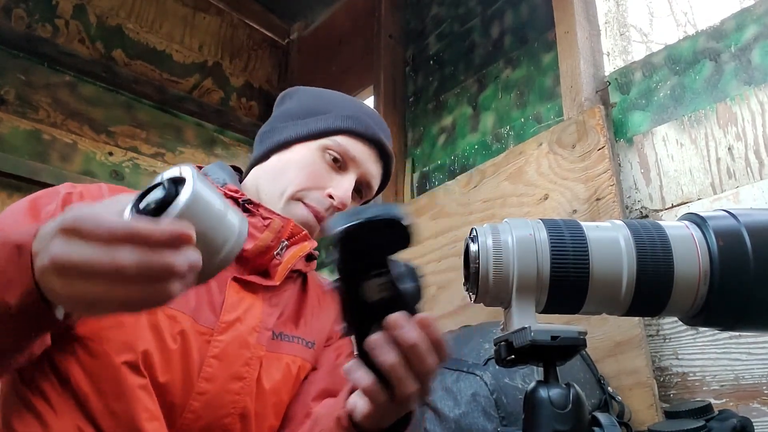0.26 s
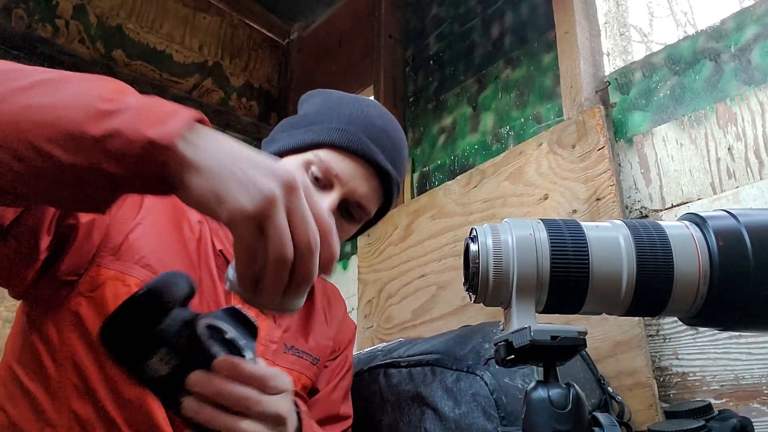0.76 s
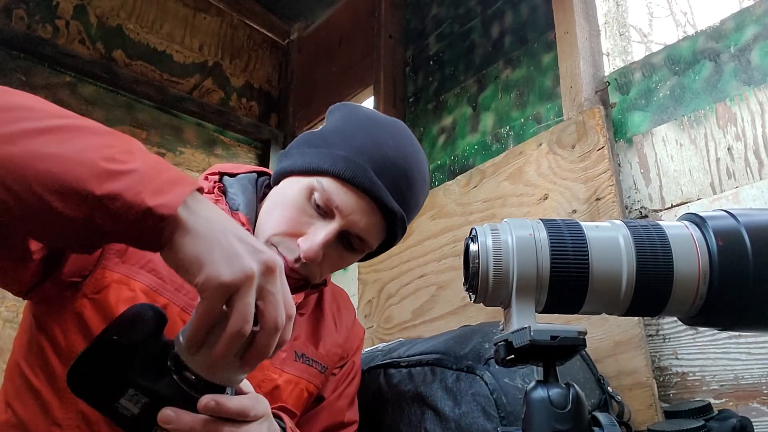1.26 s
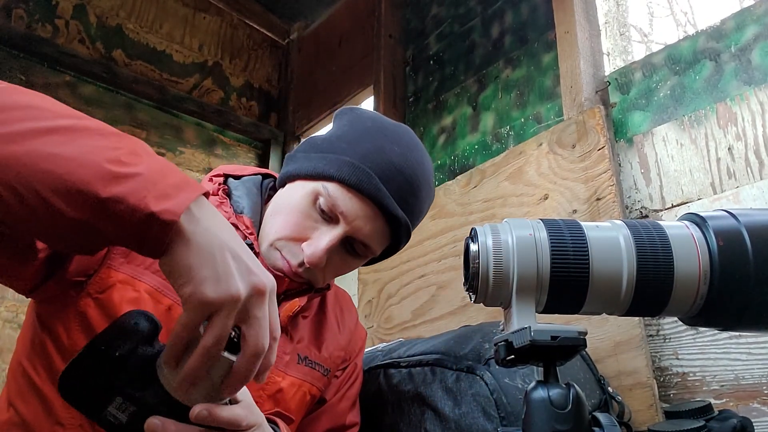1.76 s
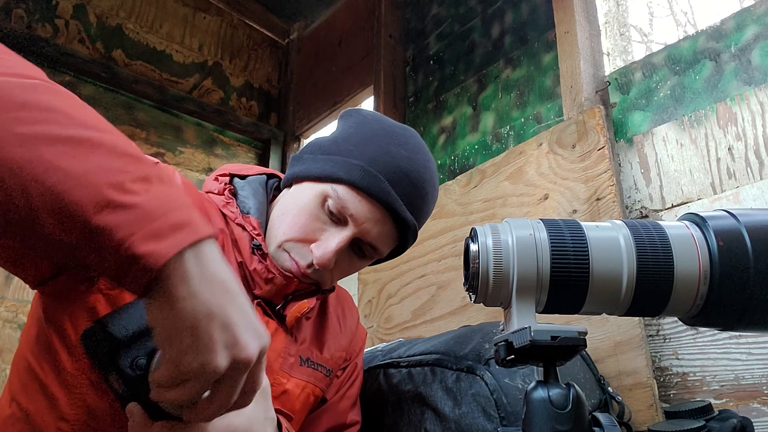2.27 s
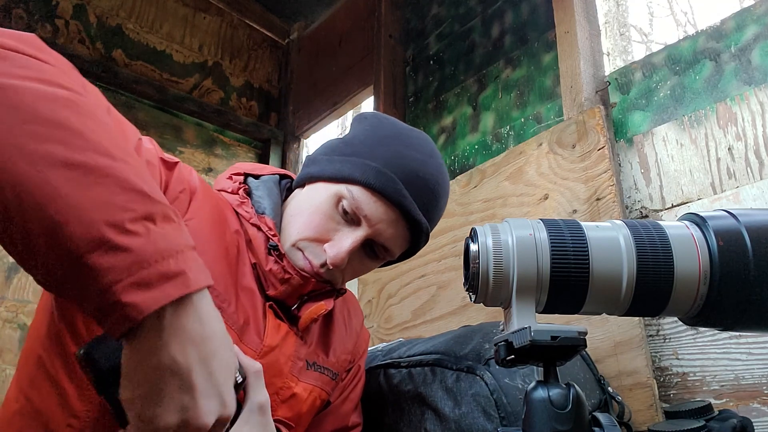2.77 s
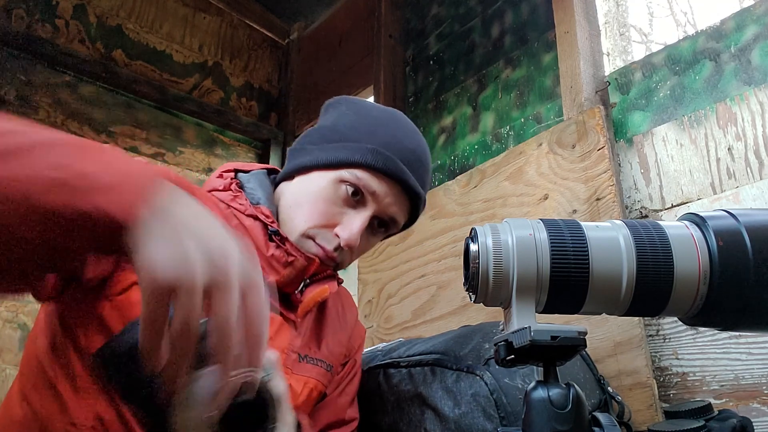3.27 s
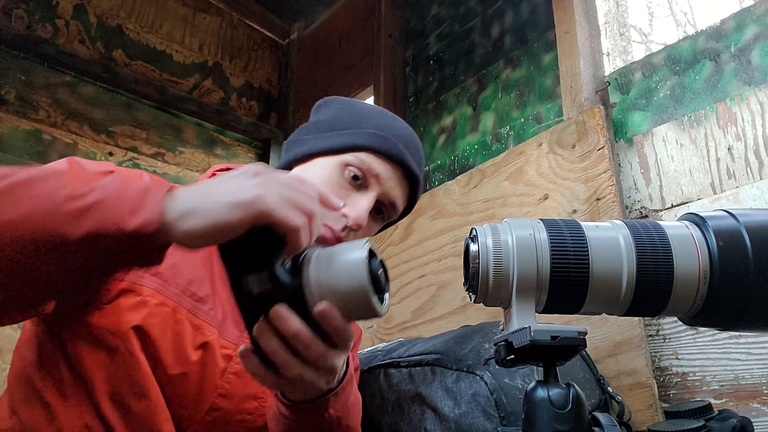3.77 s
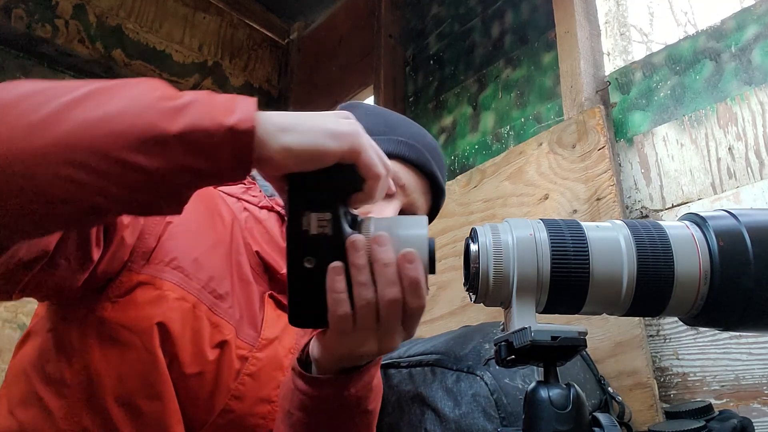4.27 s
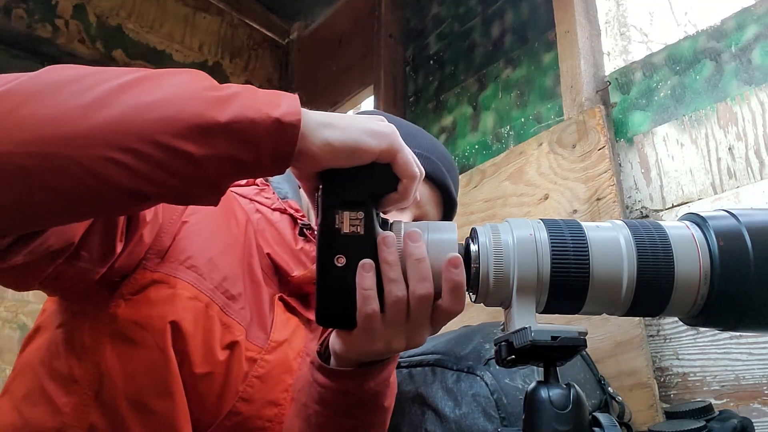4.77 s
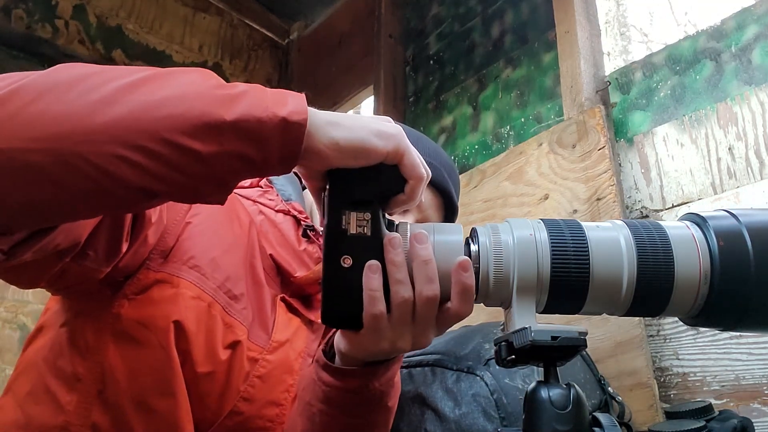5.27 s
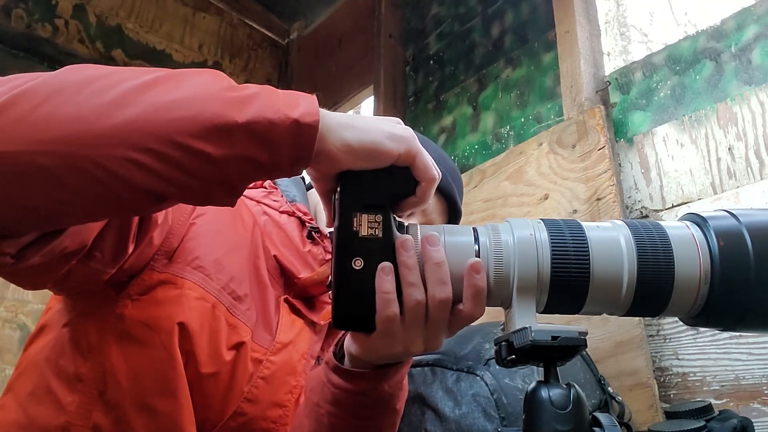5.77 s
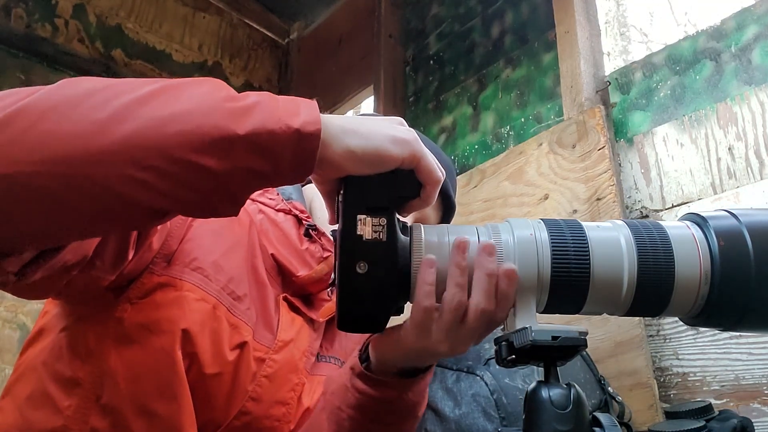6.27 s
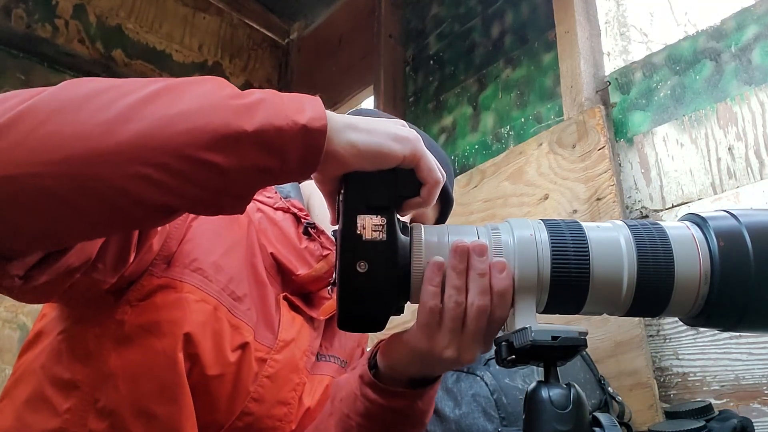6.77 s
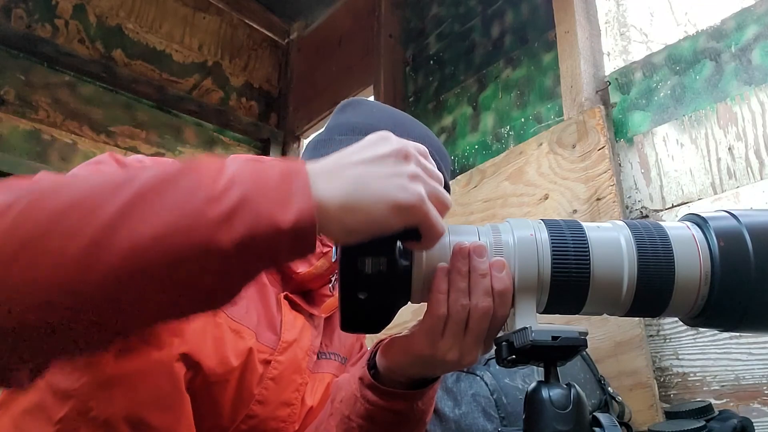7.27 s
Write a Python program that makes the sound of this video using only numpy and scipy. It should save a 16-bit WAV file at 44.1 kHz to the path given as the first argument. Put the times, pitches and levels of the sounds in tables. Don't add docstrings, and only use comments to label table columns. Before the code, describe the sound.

Close stereo pickup of hands fitting camera parts in a dry little wooden shelter. Crisp synthetic sleeve rubs lead into light metallic scraping, bright rattling clacks, a brief alignment knock and a sharp double click. Cloth moves again, then things go almost still. Softer, fuller bumps and a short grinding twist end in a snap, followed by faint scuffs, a grip bump and tiny pin click. Low distant machine rumble and slight hiss continue throughout.

```python
import sys
import numpy as np
from scipy import signal
from scipy.fft import rfft, irfft, next_fast_len
from scipy.io import wavfile
from scipy.ndimage import uniform_filter1d

SR = 44100
rng = np.random.default_rng(int(sys.argv[2]) if len(sys.argv) > 2 else 0)


def amplitude_ratio(level_db):
    exponent = np.asarray(level_db, float) / 20
    return 10 ** exponent


def master(y):
    cut = np.clip(np.atleast_2d(y).T, -1, 1)
    pcm = np.round(cut * 32767)
    wavfile.write(sys.argv[1], SR, pcm.astype(np.int16))


N = 332073
GRAIN = 32

# (time [s], strength [dB], thud over ring [dB], edge crack over strength [dB])
SEAT_HITS = [(1.3485, -36, -1.5, -12), (1.3505, -37, -7, -19), (1.3604, -42, -8.5, -3.5),
             (1.397, -34, -6, -15), (1.4160, -26.5, -9, -26), (1.4204, -35, -22, -11),
             (1.4396, -22.5, -9.5, -22), (1.4463, -28.5, 35, -34), (1.4784, -39.5, 3, -14),
             (1.494, -31.5, -0.5, -23), (1.5015, -45, 13, -26), (1.5136, -37, -1, -20),
             (1.5225, -33, 2, -38), (1.531, -48, -4, -39), (1.5655, -46, -3, -33),
             (1.573, -47.5, -10.5, -25), (1.6419, -37.5, 7.5, -24), (1.7093, -50.5, 5, -33)]
DROP_HITS = [
    (1.7752, -19.5, -12.5, -15.5),
    (1.7785, -27, -5, -14),
    (1.7818, -16.5, -28.5, -13.5),
    (1.7854, -27.5, -3, -10),
    (1.7912, -21.5, -17, -17),
    (1.7998, -18, -6.5, -21),
    (1.8034, -21.5, -18, -21),
    (1.8075, -32.5, -22, -24),
]
ALIGN_HITS = [
    (1.9135, -54.5, 4, -25),
    (1.935, -49.5, -2, -1.5),
    (1.9584, -25.5, -17, -15),
    (1.9636, -30.5, -6, -30),
]
TURN_HITS = [
    (2.1695, -51.5, 12, -25),
    (2.1849, -46.5, -3.5, -27),
    (2.2020, -28, -2, -19.5),
    (2.2035, -30, -3, -26),
    (2.2104, -35, -5.5, -30),
    (2.2175, -41.5, -3.5, -30),
    (2.3309, -58, -15, -15),
    (2.4154, -49, 25, -29),
    (2.4215, -52, 20, -29),
]
FINGER_HITS = [
    (1.187, -70, -25, -28),
    (1.2, -66.5, 4, -30),
    (2.444, -65, -20, -30),
    (2.951, -48, 20, -30),
    (2.963, -52.5, 20, -30),
    (3.369, -45.5, 25, -30),
    (3.391, -47.5, 20, -30),
]
LATCH_HITS = [(2.4904, -65, -2, 5), (2.5858, -62, -15, 5.5), (2.8851, -49.5, -22.5, 0.5),
              (2.8866, -45, -26.5, 6), (2.888, -49, -18.5, 5.5), (2.8932, -52, -15, 12.5),
              (2.8948, -50, -20, 9.5), (2.8972, -23, -31.5, -10.5), (2.8980, -17, -29, -11.5),
              (2.8996, -30, -29.5, -13), (2.9025, -25.5, -23.5, -18), (2.9855, -63, 0, -11),
              (3.0942, -63, -6, -6)]
TOUCH_HITS = [
    (4.7814, -77.5, 3, -2.5),
    (5.5495, -57, 0.5, -20),
    (5.5792, -32, 8, -25),
    (5.5838, -36.5, -2, -16),
    (5.5952, -36, -7.5, -16.5),
    (5.6004, -40, -3, -23),
    (5.6114, -43.5, -4, -16),
]
TWIST_HITS = [
    (5.882, -52, 8, -19.5),
    (5.8855, -45.5, 1, -17.5),
    (5.899, -40, 5, -15),
    (5.9115, -47, -5, -4),
    (5.9204, -38, 2, -19),
    (5.931, -42, 4, -23.5),
]
LOCK_HITS = [
    (5.9703, -29.5, 1, -14),
    (5.9764, -28.5, -5.5, -4.5),
    (5.9804, -36.5, 6, 4),
    (5.9864, -48, -4, -14),
    (6.0744, -59, -27, -30),
    (6.1973, -49.5, 10, -21),
    (6.2015, -51, 3.5, -38),
]
SETTLE_HITS = [
    (6.5804, -65, -3, -23),
    (6.8394, -58.5, 0.5, -29),
    (6.9268, -39, 10.5, -31),
    (6.9325, -40, -3, -28),
    (6.9414, -37.5, 11.5, -27),
    (6.9484, -49, -14, -27),
    (6.9545, -53, -7, -29),
]
PIN_HITS = [
    (3.597, -72.5, -15, 11.5),
    (4.594, -87, -9.5, 13),
    (6.9626, -36, -23, -22),
]

# (frequency [Hz], level [dB], t60 [s])
SEAT_MODES = [(269, -7, 0.06), (431, 2.5, 0.022), (500.5, 4, 0.018), (580, 3, 0.014), (656.5, 5, 0.034),
              (750, -24, 0.0048), (1430, 3, 0.011), (2410, -6, 0.018), (2952, 6, 0.021),
              (3340, 7.5, 0.00336), (3860, 8.5, 0.011), (4240, 6.5, 0.011)]
DROP_MODES = [(265, -1, 0.04), (430, 1, 0.03), (560, -8, 0.023), (672, -3, 0.028), (820, -2, 0.022),
              (950, -4, 0.013), (1400, -16, 0.01), (2480, -6, 0.01), (2760, -6, .012), (2990, 0, .02),
              (3095, -5, .015), (3760, -4, .012), (4030, -7, .01)]
ALIGN_MODES = [(290, -6, .04), (450, -10, .02), (610, -3, 0.03), (960, -10, 0.015), (1156, -3, 0.01),
               (1442, 1.5, 0.008), (2400, 0.5, 0.007), (2980, 2, 0.0078), (3892, -3, 0.01)]
TURN_MODES = [(285, 3, .05), (520, -5, .025), (670, -3, .025), (980, -7, .02), (1490, -1, .015),
              (1868, -6, .012), (2380, -2, .01), (2590, -2, .012), (3530, 3, .012), (4050, 4, .012)]
FINGER_MODES = [(331.5, -2, .04), (557, -2, 0.014), (2327, 3, 0.023), (2610, 5, 0.018)]
LATCH_MODES = [(520, -8, .03), (880, -10, 0.01), (1085, -4, 0.01), (1320, 4, 0.011), (1650, -3, 0.006),
               (1900, 2, 0.007), (2380, 4, 0.008), (2880, 1, .007), (3330, 3, 0.007), (4000, 7, .008),
               (4450, 5, .008), (6300, 8, 0.005)]
TOUCH_MODES = [(124.4, -1.5, 0.17), (188.6, -2, 0.13), (297, -1, 0.05), (511, -5.5, 0.046), (707, 1, 0.033),
               (1023, -8, 0.03), (1190, 1, 0.011), (1830, -2.5, 0.019), (2110, -8, 0.06),
               (4030, -13, 0.016), (5200, 4.5, .006)]
LENS_MODES = [(118.2, -9.5, 0.095), (186, -9.5, 0.11), (320, -1, 0.04), (500, -3, 0.03), (730, 2, 0.033),
              (870, -5, 0.027), (1050, 2, 0.014), (1340, -6, 0.008), (1980, -4.5, 0.014),
              (2650, -15.5, 0.0088), (4900, 5, 0.012)]
LOCK_MODES = [(191.6, -14.5, 0.26), (538, 2, 0.053), (652, 3.5, 0.042), (710, -7, 0.028), (827, -12, 0.018),
              (1038, -1.5, 0.03), (1160, -1.5, 0.041), (1340, -2, 0.016), (2040, 1, 0.013),
              (2120, -7.5, 0.016), (2530, -4, 0.015), (3840, -15, 0.015)]
GRIP_MODES = [(109, 0, 0.097), (283, 0.5, 0.15), (426, -1.5, 0.047), (511, 1, 0.036), (700, -8, 0.028),
              (999, 2, 0.008), (1320, -14, 0.0093), (1996, -12, 0.021), (2370, -7, 0.008)]
SCUFF_MODES = [(322, -4.5, 0.042), (570, -3.5, 0.029), (706, -10, 0.014), (1310, -8, 0.014),
               (2050, 0.5, 0.0059)]
PIN_MODES = [(402, 14, 0.081), (1972, 11.5, 0.034), (2260, 4.8, 0.02), (4850, 13, 0.02), (5770, 8.6, 0.022)]

# (time of most pressure [s], rise [s], fall [s], level [dB])
SEAT_SLIDES = [(1.351, 0.0022, 0.077, -42),
               (1.445, 0.04, 0.092, -47.5),
               (1.505, 0.038, 0.072, -47)]
TURN_SLIDES = [
    (2.225, 0.025, 0.16, -64),
    (2.3, 0.14, 0.1, -62.5),
]
LATCH_SLIDES = [(2.79, 0.064, .3, -73),
                (2.885, 0.15, 0.0091, -67)]
NUDGE_SLIDES = [
    (5.56, 0.012, 0.03, -62),
    (5.585, 0.0072, 0.086, -54.5),
    (5.61, 0.049, 0.04, -67.5),
]
LENS_SLIDES = [(5.882, 0.0029, 0.18, -50.5),
               (5.92, 0.038, 0.044, -54),
               (5.976, 0.005, 0.026, -39)]
GRIP_SLIDES = [
    (6.935, 0.006, 0.069, -61),
    (6.96, 0.05, 0.067, -62),
]
SCUFF_SLIDES = [
    (6.098, 0.051, 0.031, -63),
    (6.203, 0.0064, 0.055, -62.5),
    (6.585, 0.0059, 0.062, -68),
    (6.62, 0.08, 0.019, -66.5),
]

# (frequency [Hz], level [dB])
GEAR_PATH = [(100, -4), (170, -1), (300, -0.5), (1000, 4), (1800, -0.5), (3000, 2.5), (5000, -4),
             (6400, -1.5), (9000, -9.5), (12000, -1), (16000, -4)]
# (frequency [Hz], t60 [s])
HIDE_T60 = [(250, 0.2), (700, 0.094), (1500, 0.1), (3000, 0.073), (6000, 0.039), (12000, 0.041)]
# (time [s], fade either side [s], swish level [dB], crispness [dB], weave rasp over swish [dB])
ARM_MOVES = [(0.03, 0.38, -71.5, 5, -10), (0.285, 0.1, -69.5, 1, 2), (0.44, 0.15, -69.5, 2.5, 8.5),
             (0.565, 0.23, -64.5, -1, -7), (0.744, 0.19, -64, 1, -2.5), (1.002, 0.31, -73.5, 5.5, -13),
             (1.563, 0.27, -80.5, 10, -4), (1.87, 0.48, -74.5, 6.5, -6), (2.272, 0.13, -70.5, 3.5, -32),
             (2.417, 0.32, -76, 6, -1.5), (2.598, 0.23, -74, 5, -23), (2.876, 0.15, -69, 1.5, 1.5),
             (3.19, 0.15, -67, 3, -8), (3.427, 0.19, -63.5, 0.5, -0.5), (3.8, 0.26, -75.5, 5, -13),
             (4.086, 0.24, -65.5, -0.5, 0), (4.355, 0.17, -72.5, 2.5, -3.5), (4.8, 0.49, -81, 11, -4),
             (6.032, 0.14, -72, 4.5, -4), (6.443, 0.39, -85, 5, 0), (7.03, 0.37, -88, 8.5, -2),
             (7.27, 0.27, -74, 3.5, -9)]
# (low [Hz], high [Hz], level at full arm speed [dB], rise with arm speed [dB per dB],
# share of crispness [dB per dB])
CLOTH_RANGES = [
    (3200, 9930, 4.5, 1.0, -1.45),
    (153, 1400, 7.5, 1.45, 0.13),
    (10800, 18400, 8.5, 2.1, 1.0),
    (1790, 2850, 4.5, 1.0, -0.37),
]
# (frequency [Hz], level [dB])
NYLON = [(120, 3.5), (250, 9), (600, 1), (950, -8.5), (1350, -1), (1850, -8), (2600, -0.5), (4100, 4),
         (5200, 0), (6200, 4), (9300, -6), (11500, 3), (13200, 1.5), (15000, 4)]
# (frequency [Hz], level [dB per Hz])
AIR = [(15, -37), (27, -21), (45, -8), (62, -5), (85, -8), (115, -14.5), (150, -17), (330, -21.5),
       (450, -28), (750, -47.5), (1500, -49.5), (3000, -49.5), (8500, -60.5), (15000, -49.5)]
# (frequency [Hz], level [dB], width [Hz], waver [dB])
HUM = [(58, -56, 0.96, 2.2), (113.5, -65, 4, 2.5), (331.8, -72, 5, 0)]
# (frequency [Hz], left minus right [dB])
PORTS = [(200, 0), (450, -4), (800, -2.5), (1400, 6.5), (2300, -5), (4000, 4), (7000, -3.5), (11500, -3.5),
         (15000, 10)]


def gear():
    seat = contacts(SEAT_HITS, SEAT_MODES, crack_db=9.1, low_hz=280, top_hz=6900, tick_s=0.0014,
                    fine_db=1.9, pan_db=-1.9)
    seat += slide(SEAT_SLIDES, SEAT_MODES, ring_db=-13.5, scratch_db=0.48, top_hz=4200)
    drop = contacts(DROP_HITS, DROP_MODES, crack_db=7.5, low_hz=150, top_hz=4830, tick_s=0.00062,
                    fine_db=1.95, pan_db=-0.9)
    align = contacts(ALIGN_HITS, ALIGN_MODES, crack_db=7.2, low_hz=480, top_hz=4100, tick_s=0.00093,
                     fine_db=0.27, pan_db=0.0)
    turn = contacts(TURN_HITS, TURN_MODES, crack_db=5.5, low_hz=250, top_hz=3900, tick_s=0.0009,
                    fine_db=-1.5, pan_db=-2.0)
    turn += slide(TURN_SLIDES, TURN_MODES, ring_db=5.5, scratch_db=9.5, top_hz=1800)
    fingers = contacts(FINGER_HITS, FINGER_MODES, crack_db=-5, low_hz=250, top_hz=3000, tick_s=0.001,
                       fine_db=0.5, pan_db=-0.5)
    latch = contacts(LATCH_HITS, LATCH_MODES, crack_db=14, low_hz=575, top_hz=5900, tick_s=0.00059,
                     fine_db=1.5, pan_db=-0.19)
    latch += slide(LATCH_SLIDES, LATCH_MODES, ring_db=9.7, scratch_db=2.5, top_hz=4000)
    touch = contacts(TOUCH_HITS, TOUCH_MODES, crack_db=14.7, low_hz=109, top_hz=2400, tick_s=0.0004,
                     fine_db=-4, pan_db=1.7)
    touch += slide(NUDGE_SLIDES, TOUCH_MODES, ring_db=0, scratch_db=0, top_hz=4100)
    twist = contacts(TWIST_HITS, LENS_MODES, crack_db=4.6, low_hz=340, top_hz=1750, tick_s=0.0031,
                     fine_db=-6.0, pan_db=0.87)
    twist += slide(LENS_SLIDES, LENS_MODES, ring_db=-1.0, scratch_db=-2.0, top_hz=5000)
    twist += contacts(LOCK_HITS, LOCK_MODES, crack_db=6.3, low_hz=250, top_hz=2000, tick_s=0.00062,
                      fine_db=2.6, pan_db=-0.65)
    settle = contacts(SETTLE_HITS, GRIP_MODES, crack_db=2.1, low_hz=350, top_hz=2550, tick_s=0.00067,
                      fine_db=2.0, pan_db=-0.4)
    settle += slide(GRIP_SLIDES, GRIP_MODES, ring_db=1.6, scratch_db=0.88, top_hz=8600)
    settle += slide(SCUFF_SLIDES, SCUFF_MODES, ring_db=1.5, scratch_db=2.2, top_hz=2500)
    pin = contacts(PIN_HITS, PIN_MODES, crack_db=9.8, low_hz=300, top_hz=6300, tick_s=0.00033,
                   fine_db=-4.5, pan_db=-1.7)

    in_lap = [hide(grip, lag_s=-.00039, echo_db=-5) for grip in (seat, drop, align, turn, fingers)]
    on_knee = [hide(latch, lag_s=-.0003, echo_db=-5)]
    on_lens = [hide(grip, lag_s=.00047, echo_db=-4) for grip in (touch, twist, settle, pin)]
    return pair(colour(sum(in_lap + on_knee + on_lens), GEAR_PATH), share=0.97)


def contacts(events, modes, crack_db, low_hz, top_hz, tick_s, fine_db, pan_db):
    out = np.zeros((2, N + SR))
    t = np.arange(SR // 8) / SR
    for time_s, strength_db, weight_db, hard_db in events:
        thud, ring = ringing(modes, scatter_db=3)
        chance = rng.standard_normal((4, len(t)))
        crack = chance * (.5 * np.exp(-t / tick_s) + 0.19 * np.exp(-t / 0.0099))
        crack[:, 0] = 0.83 * np.sqrt(tick_s * SR) * np.sign(crack[:, 0])
        ring = ring + amplitude_ratio(crack_db) * band(crack[0], 420, top_hz)
        thud = thud + amplitude_ratio(crack_db + 8.0) * band(crack[1], low_hz, 730)
        edge = band(crack[2], 3505, 8560)
        fizz = band(crack[3], 9800, 18360)
        parts = [(ring, -max(weight_db, 0)),
                 (thud, min(weight_db, 0) - 0.5),
                 (edge, hard_db - fine_db + 12.0),
                 (fizz, hard_db + fine_db + 16.0)]
        hit = sum(amplitude_ratio(strength_db + db) * x / np.abs(x).max() for x, db in parts)
        i = int(time_s * SR)
        out[0, i:i + len(t)] += hit * amplitude_ratio(pan_db / 2)
        i += round(2 * chance[0, -1])
        out[1, i:i + len(t)] += hit * amplitude_ratio(-pan_db / 2)
    return out[:, :N]


def slide(table, modes, ring_db, scratch_db, top_hz):
    catches_per_s = 2000
    press = sum(amplitude_ratio(db) * swell(time_s, rise_s, fall_s) for time_s, rise_s, fall_s, db in table)
    press = np.repeat(press, GRAIN)[:N]
    catches = (rng.random(N) < catches_per_s / SR) * rng.standard_normal(N) * press
    catches = catches * amplitude_ratio(3.65 * walk(40) - 2.5) * np.sqrt(SR / catches_per_s)
    thud, ring = ringing(modes, scatter_db=1.5)
    body = thud + amplitude_ratio(ring_db) * ring
    body = body / np.sqrt(np.sum(body ** 2))
    scratch = band(band(catches, 560, top_hz), 550, 1.45 * top_hz)
    return signal.oaconvolve(catches, body)[:N] + amplitude_ratio(scratch_db) * scratch


def ringing(modes, scatter_db):
    t = np.arange(SR // 8) / SR
    hz, db, t60 = np.array(modes, float).T[:, :, None]
    level_chance, pitch_chance = rng.standard_normal((2, len(modes), 1))
    sign = (-1.) ** np.arange(1, len(modes) + 1)[:, None]
    decay = amplitude_ratio(db + scatter_db * level_chance - 60 * t / t60)
    partials = sign * decay * np.sin(2 * np.pi * hz * (1 + 0.02 * pitch_chance) * t)
    low = hz[:, 0] < 1000
    return partials[low].sum(0), partials[~low].sum(0)


def hide(x, lag_s, echo_db):
    t = np.arange(SR // 5) / SR
    octave = np.log2(np.maximum(np.fft.rfftfreq(len(t), 1 / SR), 90) / 90)

    def fade(noise):
        out = 0
        for k in range(9):
            one_octave = irfft(rfft(noise) * np.maximum(1 - np.abs(octave - k), 0), len(t))
            out = out + one_octave * amplitude_ratio(-20 * t / on_log(HIDE_T60, 90 * 2 ** k))
        return out

    echo = fade(rng.standard_normal((2, len(t))))
    for _ in range(2):
        spec = rfft(echo)
        even = uniform_filter1d(np.abs(spec), size=100) / (np.abs(spec) + 1e-9)
        echo = fade(irfft(spec * np.minimum(even, 3), len(t)))
    echo = echo * np.clip(t / 0.0013, 0, 1)
    echo *= amplitude_ratio(echo_db) / np.sqrt(np.sum(echo ** 2) / 2)
    echo[0, max(round(-lag_s * SR), 0)] += 1
    echo[1, max(round(lag_s * SR), 0)] += 1
    first, last = np.flatnonzero(np.abs(x[0]) > 1e-6)[[0, -1]]
    out = np.zeros((2, N + len(t)))
    out[:, first:last + len(t) - 1] = signal.oaconvolve(x[:, first:last], echo, axes=1)
    return out[:, :N]


def jacket():
    full_arm_db = -62
    shared_flicker_db = .6 * walk(14)
    moves = np.array([swell(time_s, fade_s, fade_s, round_=2.25) for time_s, fade_s, *_ in ARM_MOVES])
    arm_db, crisp_db, rasp_db = np.array(ARM_MOVES).T[2:]
    out = 0
    for k, (lo_hz, hi_hz, db, follow, lean) in enumerate(CLOTH_RANGES):
        peak_db = full_arm_db + db + follow * (arm_db - full_arm_db) + lean * crisp_db
        if k == 3:
            peak_db = peak_db + rasp_db
        catches = rng.standard_normal((2, N)) * amplitude_ratio(5.3 * rng.random((2, N)))
        gain = np.repeat(amplitude_ratio(peak_db) @ moves, GRAIN)[:N]
        flicker = amplitude_ratio(shared_flicker_db + 1.0 * walk(30))
        out = out + unit(band(catches, lo_hz, hi_hz)) * gain * flicker
    return colour(pair(out, share=0.98), NYLON)


def air():
    noise = pair(rng.standard_normal((2, N)), share=.89)
    out = unit(colour(noise, AIR)) * amplitude_ratio(-57.5)
    t = np.arange(N) / SR
    for hz, db, width_hz, waver_db in HUM:
        level = np.sqrt(2) * amplitude_ratio(db + waver_db * walk(width_hz))
        out = out + level * np.sin(2 * np.pi * hz * t + 0.6 * walk(width_hz))
    return out


def swell(time_s, rise_s, fall_s, round_=1):
    late = np.arange(0, N, GRAIN) / SR - time_s
    length = np.where(late < 0, max(rise_s, 1e-3), max(fall_s, 1e-3))
    return amplitude_ratio(-18 * np.abs(late / length) ** round_)


def walk(rate):
    k = int(SR / rate)
    held = np.repeat(rng.standard_normal(N // k + 1), k)
    return unit(uniform_filter1d(held, k)[:N])


def pair(x, share):
    low = signal.butter(2, 470, fs=SR, output="sos")
    share = np.clip(share, 0, 1)
    change = share * x[0] + (np.sqrt(1 - share ** 2) - 1) * x[1]
    return np.array([x[0], x[1] + signal.sosfiltfilt(low, change)])


def on_log(table, hz):
    table = np.array(table, float)
    return np.interp(np.log(np.maximum(hz, 1)), np.log(table[:, 0]), table[:, 1])


def colour(x, table):
    n = x.shape[-1]
    size = next_fast_len(n)
    gain = amplitude_ratio(on_log(table, np.fft.rfftfreq(size, 1 / SR)))
    return irfft(rfft(x, size) * gain, size)[..., :n]


def band(x, lo_hz, hi_hz):
    sos = signal.butter(2, [lo_hz, min(hi_hz, .49 * SR)], "band", fs=SR, output="sos")
    return signal.sosfilt(sos, x)


def unit(x):
    return x / np.sqrt(np.mean(x ** 2))


def scene():
    return gear() + jacket() + air()


def roll_off(x):
    return signal.sosfilt(signal.butter(12, 16820, fs=SR, output="sos"), x)


def record(dry):
    left = [(hz, db / 2) for hz, db in PORTS]
    right = [(hz, -db / 2) for hz, db in PORTS]
    ports = np.array([colour(dry[0], left), colour(dry[1], right)])
    top_cut = signal.ellip(8, .3, 30, 15850, fs=SR, output="sos")
    mix = signal.sosfilt(top_cut, ports)
    return roll_off(mix)


dry = scene()
out = record(dry)
master(out)
```